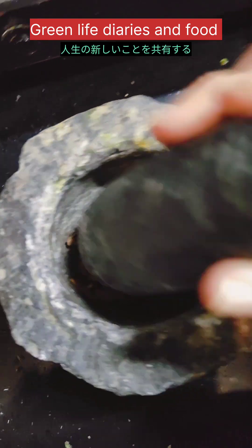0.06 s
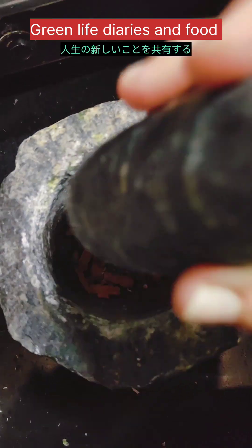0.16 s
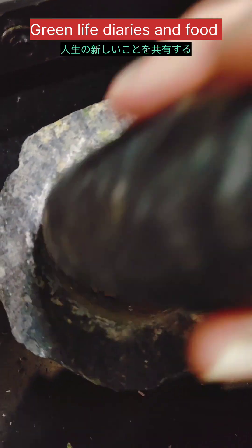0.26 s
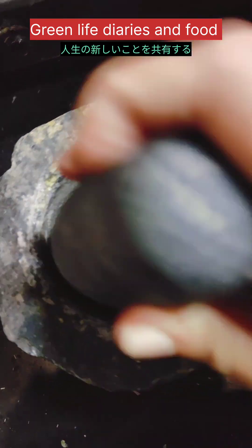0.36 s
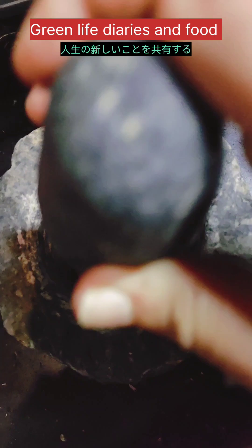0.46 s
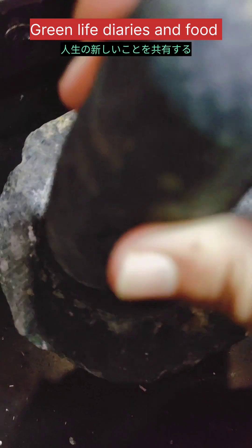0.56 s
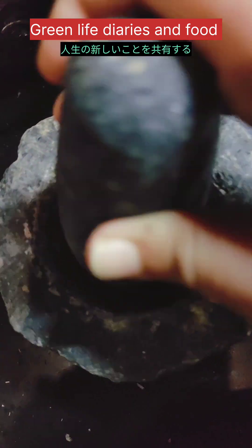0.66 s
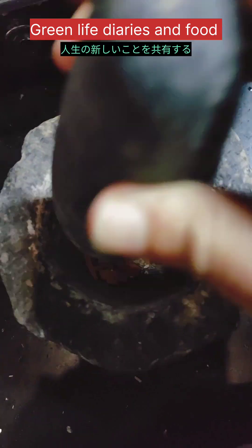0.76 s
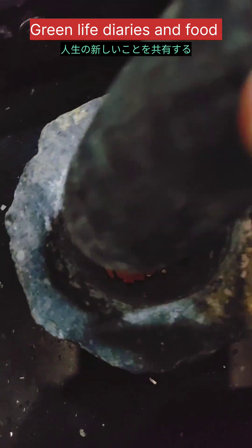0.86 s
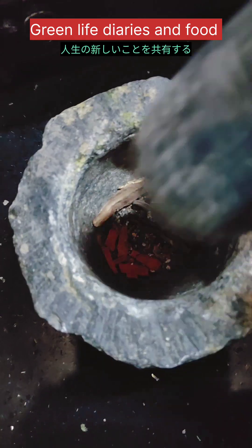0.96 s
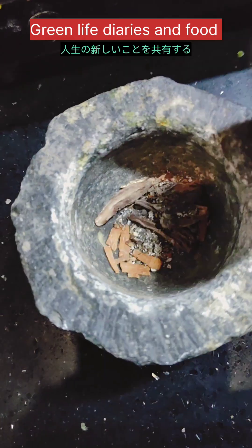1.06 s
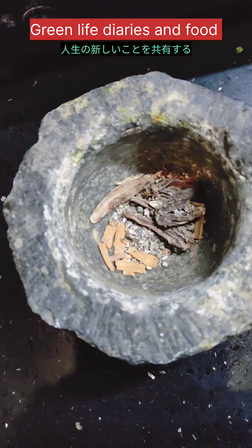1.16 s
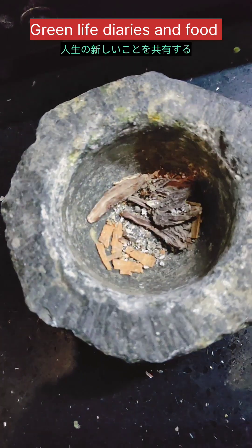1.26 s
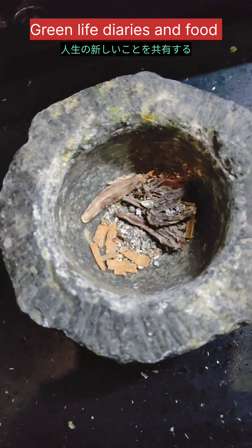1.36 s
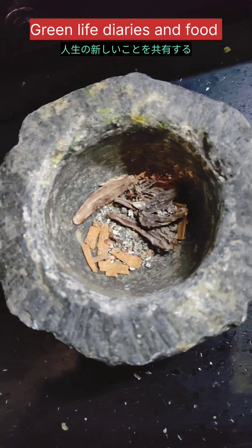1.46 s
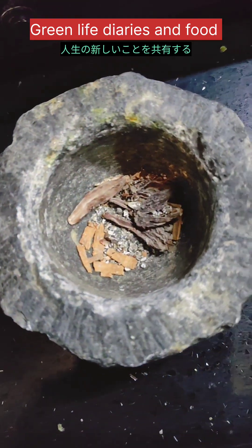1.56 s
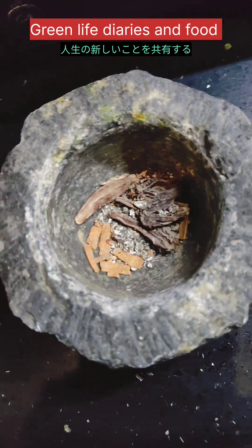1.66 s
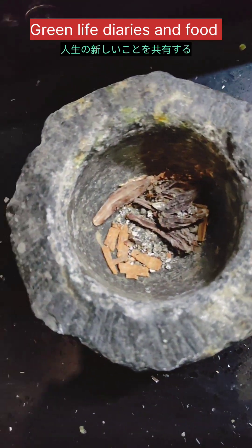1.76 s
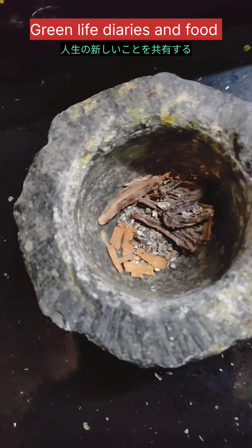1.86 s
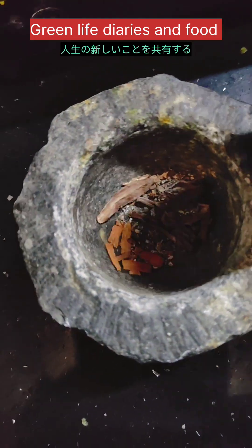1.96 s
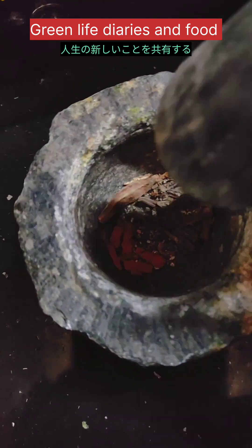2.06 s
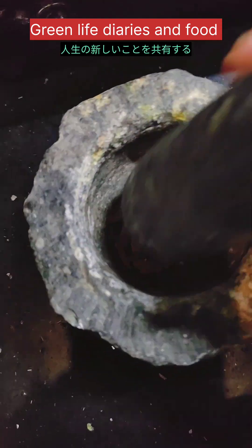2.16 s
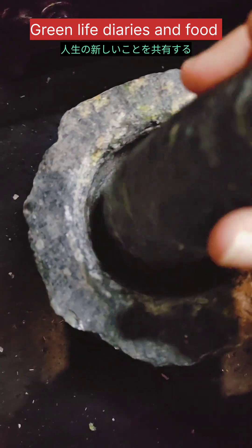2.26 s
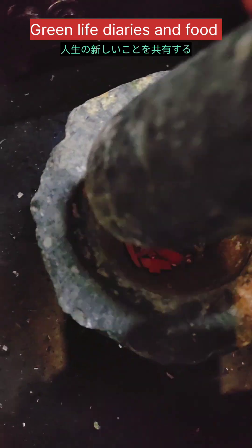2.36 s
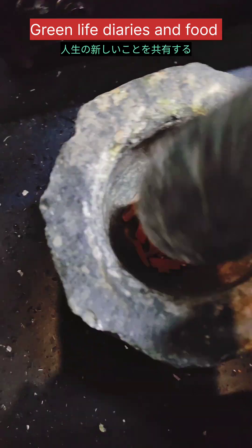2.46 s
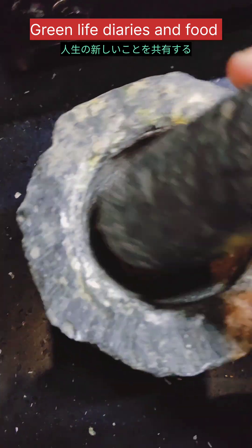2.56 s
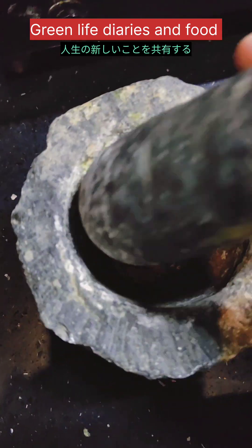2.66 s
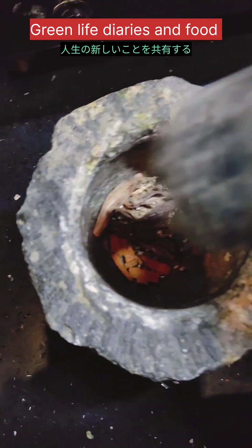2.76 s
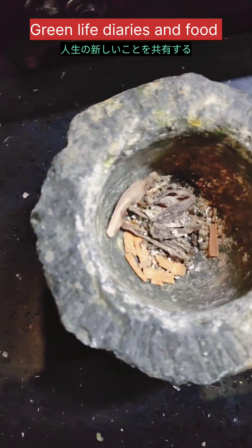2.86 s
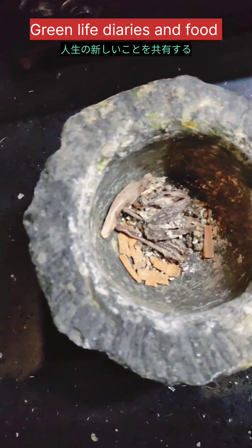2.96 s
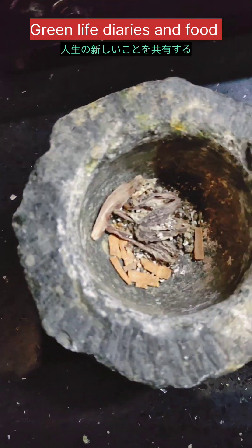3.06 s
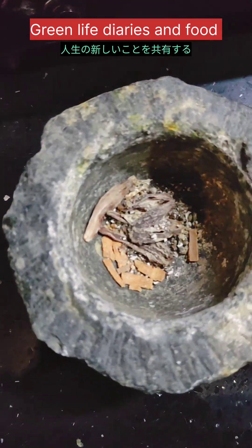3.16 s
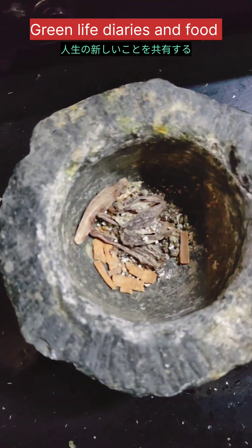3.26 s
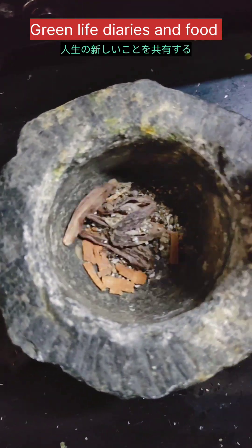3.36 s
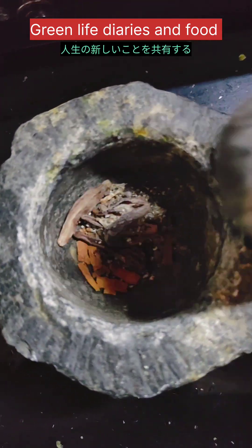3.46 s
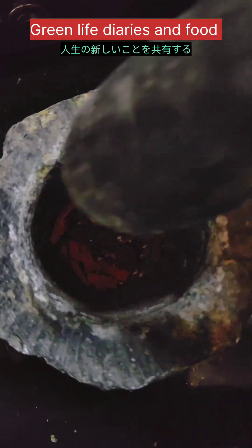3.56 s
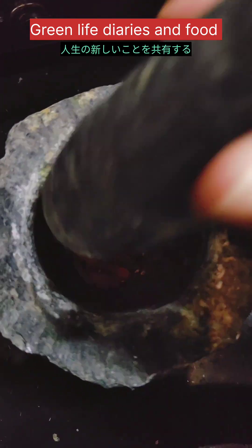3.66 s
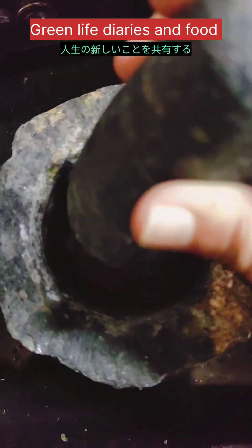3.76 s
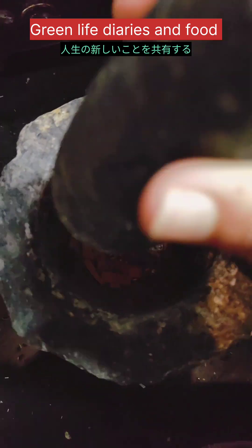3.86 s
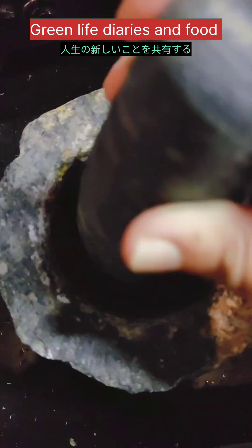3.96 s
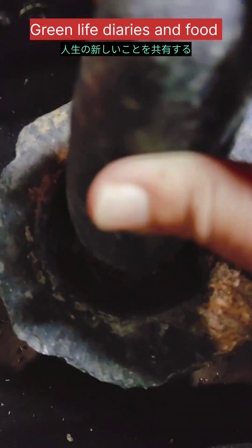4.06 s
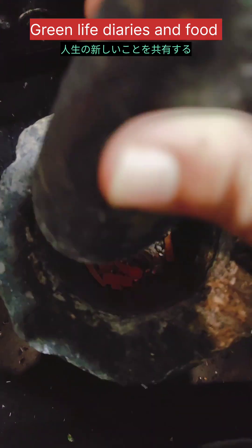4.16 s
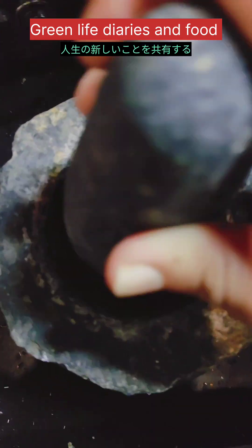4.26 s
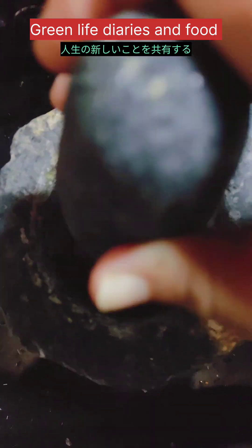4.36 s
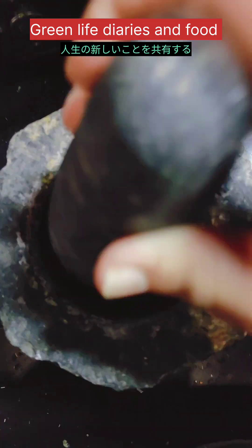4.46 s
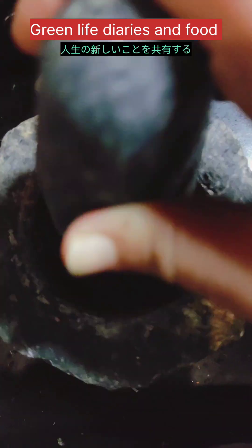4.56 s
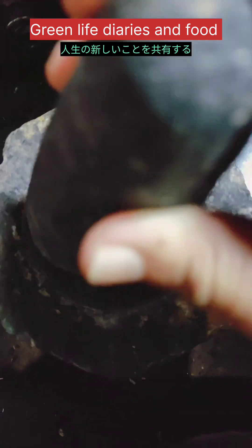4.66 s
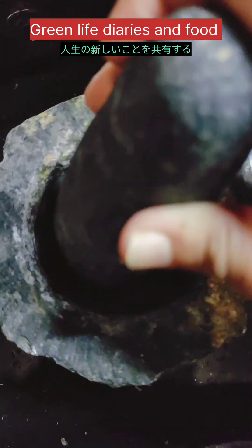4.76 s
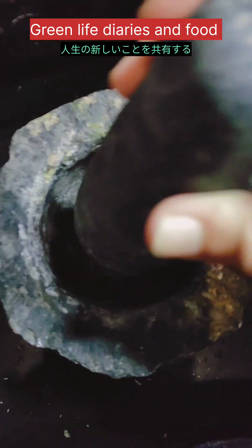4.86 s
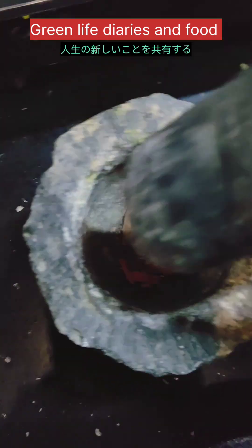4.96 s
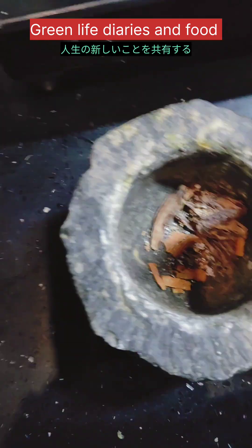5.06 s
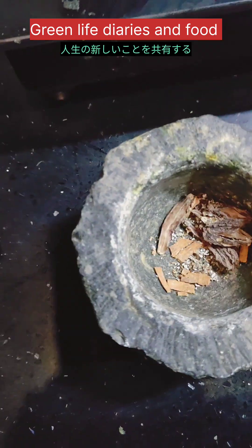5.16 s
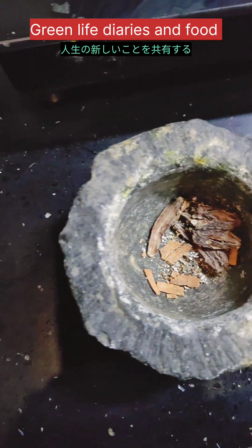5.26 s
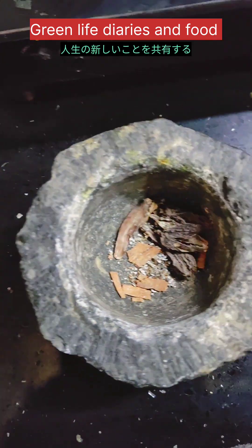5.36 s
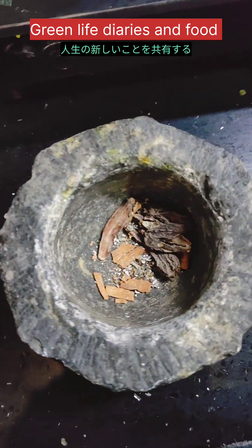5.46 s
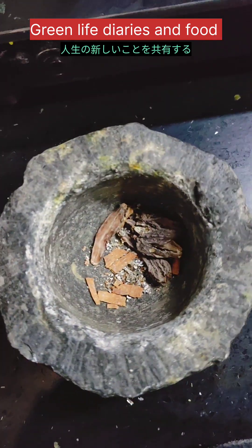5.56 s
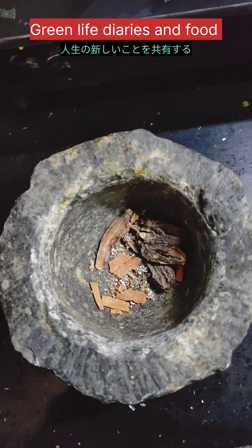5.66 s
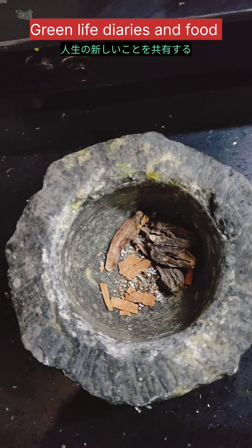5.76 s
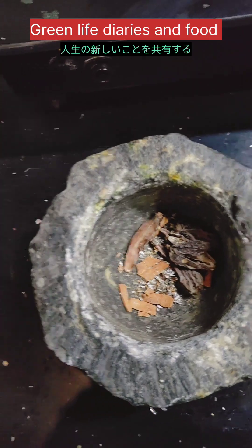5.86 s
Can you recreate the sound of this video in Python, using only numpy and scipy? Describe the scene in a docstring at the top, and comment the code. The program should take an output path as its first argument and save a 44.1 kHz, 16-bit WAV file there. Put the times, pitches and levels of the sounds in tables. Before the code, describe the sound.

Close, thudding knocks and hard clacks of a pestle cracking bark and seeds in a stone mortar, with pauses and a low hum behind.

```python
"""A stone pestle pounds bark and seeds in a stone mortar on a kitchen counter, close to a phone.
Each pound cracks the spices, thuds through the mortar into the counter and sets the bowl ringing.
The pestle often clacks on the bare stone wall, and once scrapes along it. A small hard room echoes
every knock, a fan hums behind, and the phone turns the loudest peaks down."""
import sys
import numpy as np
from scipy import signal
from scipy.fft import rfft, irfft
from scipy.io import wavfile
from scipy.ndimage import uniform_filter1d, minimum_filter1d

SR = 44100
rng = np.random.default_rng(int(sys.argv[2]) if len(sys.argv) > 2 else 0)


def output_pcm(signal):
    """Save a mono or channel-first signal as 16-bit PCM at the path in sys.argv[1].

    Samples are clipped to [-1, 1] before scaling.
    """
    pcm = np.clip(np.atleast_2d(signal).T, -1, 1) * 32767
    wavfile.write(sys.argv[1], SR, np.round(pcm).astype(np.int16))


N = 261072
TIME = np.arange(N) / SR
TAIL = TIME[:SR * 3 // 4]  # time axis of one dying sound

# the pestle lands on the spices: t/s, thud/dB, bowl and room ring/dB, crack of the spices/dB
POUNDS = [(0.1751, 1, -10, -24.5), (0.495, 2.5, -8, -23.5), (0.7804, 3, -8, -28.5),
          (2.3496, -1.5, -9.5, -23.5), (3.8755, 2.5, -10.5, -18.5), (4.1568, 5, -6, -27),
          (4.423, 4.5, -8.5, -27.5), (4.674, 3, -9, -22), (4.924, 3, -5, -28.5)]
# the pestle hits bare stone:
# t/s, click/dB, click pitch/Hz, thud/dB, counter boom/dB, bowl and room ring/dB, pestle ping/dB
CLACKS = [(0.1556, -3, 1510, -5.5, -30, -10.5, -35), (0.3029, -5.5, 2850, -21, -20, -19.5, -43.5),
          (.332, -25, 1500, -22, -41, -21.5, -53), (2.3082, -5, 1000, -5, -3.5, -4, -63),
          (2.330, 4, 1530, -29, -14, -7, -52), (2.665, -2, 1440, -10.5, -12, -10.5, -36),
          (2.679, 5, 1690, -6, -6.5, 0.5, -30), (2.695, -22, 1500, -24, 2.5, -6.5, -29.5),
          (4.395, -10, 920, -5.5, -11, -10, -41), (4.811, -14.5, 1450, -17, -38, -22.5, -63),
          (4.925, 8, 930, -30, -25, -6.5, -54), (4.951, -27, 1200, -20.5, -18, -7, -60),
          (5.5667, 4, 865, -16.5, -13, -6, -54), (5.6511, -1, 800, -13, -14.5, -12.5, -66)]
# what the shaded left microphone hears compared with the right: f/Hz, level/dB
LEFT_SHADE = [(250, -1), (480, -7.5), (700, -11), (1000, -16.5), (1500, -17), (2100, -23.5), (4500, -18),
              (6500, -34), (11000, -32), (13500, -14), (15500, 4)]


def undb(db):
    """Turn decibels into a factor to multiply by."""
    return 10 ** (np.asarray(db) / 20)


def rms(x):
    """Average strength of a signal (root mean square)."""
    return np.sqrt(np.mean(x ** 2))


def colour(x, points):
    """Make some pitches louder and others softer, along a curve of (f/Hz, level/dB) points."""
    size = 2 ** int(np.ceil(np.log2(len(x) + SR // 10)))
    hz, db = np.transpose(points)
    curve_db = np.interp(np.log(np.fft.rfftfreq(size, 1 / SR) + 1), np.log(hz), db)
    # keeping half of the cepstrum makes a filter that never sounds before its input
    cepstrum = irfft(np.log(undb(curve_db)))[:size // 2]
    cepstrum[1:] *= 2
    return irfft(rfft(x, size) * np.exp(rfft(cepstrum, size)))[:len(x)]


def add(track, s, sound):
    """Mix a sound into a track, starting at s seconds."""
    start = max(int(round(s * SR)), 0)
    track[start:start + len(sound)] += sound[:N - start]


def through(drive, response):
    """Play a signal through an object or room, given its response to one sharp tap."""
    return signal.fftconvolve(np.atleast_2d(drive), np.atleast_2d(response), axes=1)[:, :N]


def ring(modes, rise_s):
    """Tones that swell, then each drop 60 dB in t60 seconds; the wave starts with a dip."""
    swing = sum(undb(db - 60 * TAIL / t60) * np.sin(2 * np.pi * hz * TAIL) for hz, db, t60 in modes)
    return -swing * (1 - np.exp(-TAIL / rise_s))


def stereo(x, left_db, left_lag_s=0):
    """A nearby sound reaches the left microphone with its own level and delay."""
    t = TIME[:len(x)]
    return np.array([undb(left_db) * np.interp(t - left_lag_s, t, x, left=0), x])


def swell_and_fade(rise_s, t60):
    """Echoes build up and die away; the first ones, from inside the bowl, are the strongest."""
    early = 1 + 1.97 * np.exp(-TAIL / 0.005)
    return (1 - np.exp(-(TAIL / rise_s) ** 2)) * early * np.exp(-np.log(1000) * TAIL / t60)


def noise_burst(noise, points, rise_s, t60):
    """Colour two channels of noise, shade the left one and let both swell and fade."""
    left, right = (colour(channel, points) for channel in noise)
    return np.array([colour(left, LEFT_SHADE), right]) / rms(right) * swell_and_fade(rise_s, t60)


def wander(rate):
    """Drift randomly around zero, toward a new value `rate` times a second."""
    points = rng.standard_normal(int(TIME[-1] * rate) + 2)
    return np.interp(TIME * rate, np.arange(len(points)), points)


def fan():
    """A fan makes a steady rush of air, wavering motor tones and a thin high hiss."""
    # tone colour of the rushing air: f/Hz, level/dB
    air_colour = [(25, -42), (48, -12.5), (70, -19.5), (130, -21), (200, -5), (300, 0.5), (420, -3),
                  (1250, -2), (1800, -10), (2450, -5), (3300, -27), (4600, -33.5), (6000, -50),
                  (10000, -68), (12500, -45), (16000, -59)]
    # the fan at the left microphone compared with the right: f/Hz, level/dB
    fan_shade = [(200, -1.5), (450, -5.5), (700, -10), (1200, -12), (2200, -23.5), (4000, -23), (7000, -5),
                 (13000, 0)]
    # motor and blade tones: f/Hz, level/dB
    tones = [(49, -78), (287, -45), (574, -54), (692, -54.5), (1310, -50.5)]
    air_db, hiss_db, hiss_hz = -38, -76, 7850
    left, right, hiss = rng.standard_normal((3, N))
    bass = signal.butter(2, 380, fs=SR, output="sos")
    left = left + signal.sosfiltfilt(bass, right - left)  # both sides share the same bass
    left, right = colour(colour(left, air_colour), fan_shade), colour(right, air_colour)
    air = np.array([left, right]) / rms(right) * undb(air_db + 0.76 * wander(4.88))
    hum = np.zeros(N)
    for hz, db in tones:
        strength = undb(db + 1.3 * wander(4.68)) * np.sqrt(2)
        pitch_hz = hz * (1 + 0.00285 * wander(14))
        hum += strength * np.sin(2 * np.pi * np.cumsum(pitch_hz) / SR)
    band = signal.iirpeak(hiss_hz, 7, fs=SR)
    hiss = signal.lfilter(*band, signal.lfilter(*band, hiss))
    hiss = undb(hiss_db) * stereo(hiss / rms(hiss), left_db=-33)
    return air + np.array([colour(hum, fan_shade), hum]) + hiss


def scrape():
    """Grit rubs between pestle and wall: a soft grainy hiss that swells and dies away."""
    # the pestle is drawn out along the wall: t/s, level/dB
    scrapes = [(5.094, -44.5)]
    # tone colour of the rubbing grit: f/Hz, level/dB
    grit_colour = [(1500, -20), (3000, 2), (4400, 0), (6700, -16), (7800, -4), (9500, -10), (14500, -21),
                   (16000, -30)]
    grit = undb(2.7 * rng.exponential(size=(2, len(TAIL)))) * rng.standard_normal((2, len(TAIL)))
    rub = noise_burst(grit, grit_colour, rise_s=0.015, t60=0.71)
    out = np.zeros((2, N))
    for s, db in scrapes:
        for track, sound in zip(out, rub):
            add(track, s, undb(db) * sound)
    return out


def thin_ring():
    """A faint, thin tone near 4.9 kHz lingers after the pounds, most after the heavier ones."""
    # two close high tones: f/Hz, level/dB, fade time/s
    thin_tones = [(4800, -7, .25), (4940, 0, .36)]
    offset_db = -43  # added to the pound's thud and ring levels
    track, tone = np.zeros(N), ring(thin_tones, rise_s=0.0024)
    for s, thud_db, ring_db, _ in POUNDS:
        add(track, s, undb(offset_db + thud_db + ring_db) * tone)
    return stereo(track, left_db=-24)


def crunches():
    """List every time the spices crack, crumble, snap or slide: t/s, level/dB, spread/s."""
    # one piece of bark snaps under the pestle: t/s, level/dB
    snaps = [(.248, -35.5), (2.335, -22.5), (2.677, -31), (3.945, -43), (4.494, -35.5), (4.802, -49),
             (4.979, -30.5), (5.046, -44)]
    # loose crumbs slide in the bowl: t/s, level/dB, spread/s
    slides = [(.255, -46, .008), (2.08, -66.5, 0.031), (2.712, -37.5, 0.007), (3.677, -62, 0.031),
              (4.768, -49.5, .014), (5.588, -51, 0.015)]
    crack_spread_s = .0015
    for s, _, _, crack_db in POUNDS:
        yield s - .0008, crack_db, crack_spread_s  # spices crack just before the pestle stops
        yield s + .027, -42.5, .011  # then crumble under its weight
    for s, db in snaps:
        yield s, db, crack_spread_s
    yield from slides


def spices():
    """Bark and seeds break in swarms of tiny cracks of very unequal size."""
    # tone colour of one crack: f/Hz, level/dB
    crack_colour = [(500, 2.5), (2400, 13), (4000, 3), (5500, 4.5), (7100, -2.5), (7800, 10), (8700, 11),
                    (10400, 0.5), (12000, 0.5), (14500, -9), (16000, -11)]
    # the highest treble beams straight up out of the bowl: f/Hz, boost/dB
    treble_beam = [(9500, 1.5), (13000, 4)]
    cracks = np.zeros(N)
    for s, db, spread_s in crunches():
        t = np.arange(-3 * spread_s, 3 * spread_s, 1 / SR)
        swell = np.exp(-.5 * (t / spread_s) ** 2)
        sizes = undb(3.5 * rng.exponential(size=len(TAIL))) * rng.standard_normal(len(TAIL))
        breaks = rng.random(len(TAIL)) < .25
        swarm = swell * (sizes * breaks)[:len(t)]
        add(cracks, s + t[0], undb(db) * swarm * rms(swell) / (rms(swarm) + 1e-9))
    snap = colour(signal.unit_impulse(len(TAIL)), crack_colour)
    beamed = colour(snap, treble_beam)
    direct = np.array([colour(beamed, LEFT_SHADE), beamed]) / np.linalg.norm(snap)
    echoes = noise_burst(rng.standard_normal((2, len(TAIL))), crack_colour, rise_s=0.0053, t60=0.17)
    return through(cracks, direct + undb(-3) * echoes / np.linalg.norm(echoes[1]))


def clacks():
    """Stone hits stone: a click only a wave or two long, and a thin ping from the pestle."""
    # the pestle's two close tones: f/Hz, level/dB, fade time/s
    pestle_modes = [(8290, 0, .19), (8335, -8, .12)]
    # tone colour of the click: f/Hz, level/dB
    click_colour = [(150, -33), (450, -1.5), (3300, 13), (4200, -42), (5500, -19), (7500, -31),
                    (16000, -23)]
    clicks, pings = np.zeros((2, N))
    ping = ring(pestle_modes, rise_s=0.0016)
    for s, click_db, click_hz, *_, ping_db in CLACKS:
        cycles = TAIL[:SR // 50] * click_hz
        click = -cycles * np.exp(-cycles / 0.23) * np.sin(2 * np.pi * cycles)
        add(clicks, s, undb(click_db) * click / abs(click).max())
        add(pings, s, undb(ping_db) * ping)
    clicks = stereo(colour(clicks, click_colour), left_db=-3.4, left_lag_s=-0.000077)
    return clicks + stereo(pings, left_db=-44)


def landings():
    """List every blow: t/s, thud/dB, boom/dB, ring/dB, hardness/Hz, time to give way/s."""
    bed_ring_db, bed_hardness_hz, bed_give_s = -8, 2100, 0.0072  # an average bed of spices
    stone_hardness_hz, stone_give_s = 2630, 0.00022  # bare stone hardly gives
    for s, thud_db, ring_db, _ in POUNDS:
        # a thinner bed rings louder, feels harder and gives way sooner
        thinness = ring_db - bed_ring_db
        hardness_hz = bed_hardness_hz * 2 ** (0.33 * thinness)
        give_s = bed_give_s / 2 ** (0.36 * thinness)
        boom_db = thud_db + 2.5  # a pound drives straight down into the counter
        yield s, thud_db, boom_db, ring_db, hardness_hz, give_s
    for s, click_db, _, thud_db, boom_db, ring_db, _ in CLACKS:
        hardness_hz = stone_hardness_hz * 2 ** (.022 * click_db)  # a louder click is a shorter contact
        yield s, thud_db, boom_db, ring_db, hardness_hz, stone_give_s


def contact(hardness_hz):
    """The push of one blow, with strength 1 at 1 kHz: the harder it is, the shorter."""
    t = TAIL[:SR // 100]
    force = t * np.exp(-2 * np.pi * hardness_hz * t)
    return force / abs(np.sum(force * np.exp(-2j * np.pi * 1000 * t)))


def knocks():
    """Every blow of the pestle rocks the mortar, shakes the counter and rings the bowl and the room."""
    # the heavy mortar rocking on the counter: f/Hz, level/dB, fade time/s
    mortar_modes = [(212.4, -34, 0.45), (237.1, -4.5, 0.12), (283, -20.5, 0.31), (318.2, -13, 0.19),
                    (333.2, -15, 0.22), (360, -32, 0.44), (452.4, -11.5, 0.11), (483.2, -17.5, 0.16),
                    (503, -9, 0.054), (619, -14, 0.041)]
    # the counter and the cupboard below it: f/Hz, level/dB, fade time/s
    counter_modes = [(46.1, -17, 0.32), (67, -11.5, 0.14), (80.3, -23, 0.25), (94.3, -27, 0.34),
                     (146.7, -32.5, 0.37), (177.4, -37.5, 0.42)]
    # the bowl and the nook it stands in: f/Hz, level/dB, fade time/s
    bowl_modes = [(865.4, -8, 0.2), (959, -2.5, 0.1), (1224, -18, 0.09), (1314, -5.5, 0.18),
                  (1548, -12.5, 0.19), (1615, -7.5, 0.13), (1730, -14, 0.27), (2200, 0, 0.072),
                  (2180, -28, 0.11), (3060, -14, 0.08), (3530, -22, 0.087)]
    # tone colour of the room's echoes: f/Hz, level/dB
    room_colour = [(120, -21), (250, -7.5), (450, 0), (700, -4), (1000, 0), (1500, -1.5), (1900, -6.5),
                   (2350, -3), (3200, -13.5), (4000, -20), (6900, -33), (8300, -23.5), (10500, -42),
                   (16000, -43)]
    boom_lag_s = 0.0024  # the mortar sinks onto the counter before it pushes
    mortar_push, counter_push, bowl_push, left, right = np.zeros((5, N))
    walls = rng.standard_normal((2, len(TAIL)))
    for s, thud_db, boom_db, ring_db, hardness_hz, give_s in landings():
        force = contact(hardness_hz)
        add(mortar_push, s, undb(thud_db) * force / force.sum())
        add(counter_push, s + boom_lag_s, undb(boom_db) * force / force.sum())
        add(bowl_push, s + give_s, undb(ring_db) * force)  # stone rings once the spices have given way
        # the walls stay put while hand and pestle move, so half of the echo pattern is new each time
        pattern = (walls + rng.standard_normal(walls.shape)) / np.sqrt(2)
        echoes = pattern * swell_and_fade(give_s, t60=0.28)
        for track, sound in zip((left, right), through(force, echoes)):
            add(track, s, undb(ring_db) * sound)
    tone = colour(signal.unit_impulse(len(TAIL)), room_colour)
    room = through([left, right], [colour(tone, LEFT_SHADE), tone]) / np.linalg.norm(tone)
    mortar = stereo(ring(mortar_modes, rise_s=0.0015), left_db=0, left_lag_s=0.00025)
    counter = stereo(-ring(counter_modes, rise_s=0.014), left_db=1.8)  # heavy, so slow to start swinging
    bowl = stereo(ring(bowl_modes, rise_s=0.0023), left_db=-10, left_lag_s=0.0002)
    return (through(mortar_push, mortar) + through(counter_push, counter)
            + through(bowl_push, bowl) + undb(0.5) * room)


def scene():
    """Knocks, stone clacks, a faint thin ring, cracking spices and a scrape over the fan."""
    return knocks() + clacks() + thin_ring() + spices() + scrape() + fan()


def record(dry):
    """The phone drops the deepest bass, turns each side down just ahead of a peak and cuts the top."""
    bottom_hz, top_hz = 32, 16300
    ceiling, hold_s = 0.85, 0.0028
    sound = signal.sosfilt(signal.butter(2, bottom_hz, "high", fs=SR, output="sos"), dry)
    window = 2 * int(hold_s * SR / 2) + 1
    needed_gain = ceiling / np.maximum(abs(sound), ceiling)
    smooth_gain = uniform_filter1d(minimum_filter1d(needed_gain, window), window)
    return signal.sosfilt(signal.ellip(8, .2, 70, top_hz, fs=SR, output="sos"), sound * smooth_gain)


dry = scene()
out = record(dry)
output_pcm(out)
```